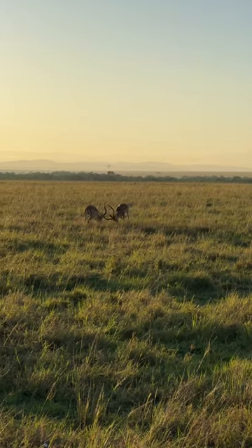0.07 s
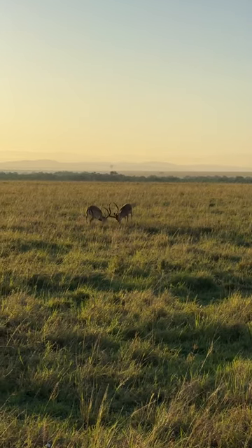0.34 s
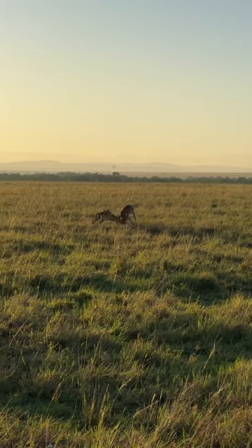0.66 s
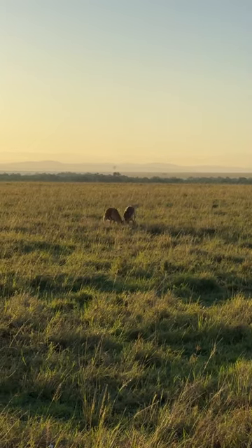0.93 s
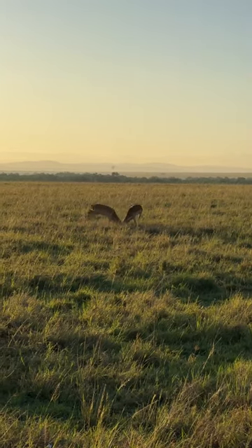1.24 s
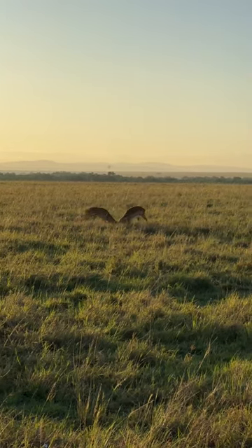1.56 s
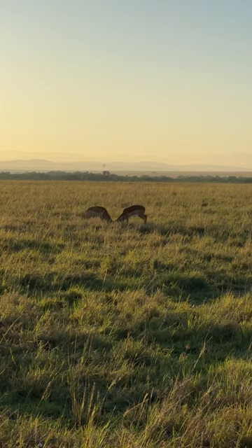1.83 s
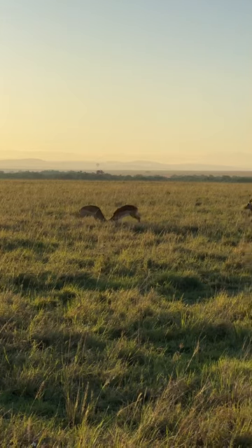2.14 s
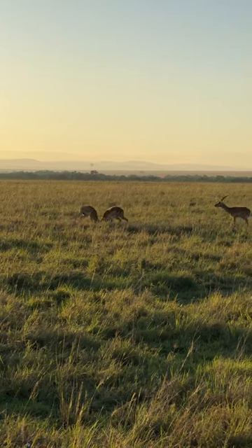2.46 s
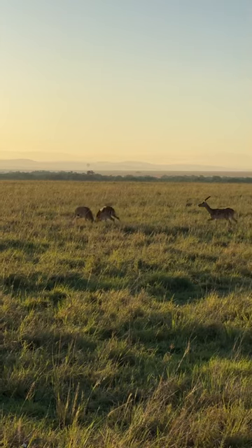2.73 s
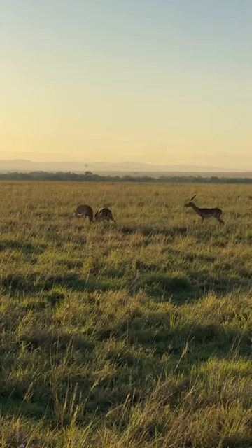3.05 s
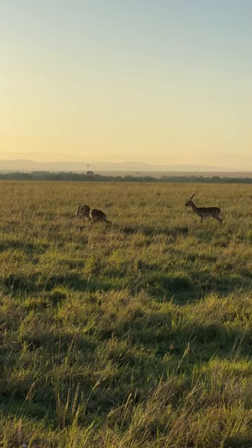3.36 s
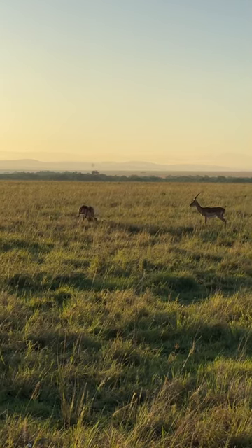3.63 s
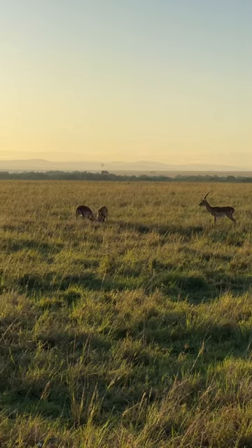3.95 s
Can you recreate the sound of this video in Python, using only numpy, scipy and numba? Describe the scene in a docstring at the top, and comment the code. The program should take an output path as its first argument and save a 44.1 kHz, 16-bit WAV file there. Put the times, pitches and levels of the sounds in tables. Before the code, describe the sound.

Antelopes grunt roughly as they fight in open grassland. One grunt leads into a brief clatter of horns, then rasping calls and more grunts with nasal wheezes, as light wind buffets the microphone.

```python
"""First comes light wind, bumping the microphone over a faint hiss of grass on an open plain.
Then two antelopes fight. Their horns knock, with one clatter as they lock.
Slow flaps of the throat make it ring in four low, rattling grunts; around and during the first
and fourth, air wheezes through the nostrils. Faster flaps make thin, rasping calls,
and a faint, slow grunt is the last call."""
import sys
import numpy as np
from scipy import signal
from scipy.fft import rfft, irfft
from scipy.io import wavfile
from numba import njit

SR = 44100
rng = np.random.default_rng(int(sys.argv[2]) if len(sys.argv) > 2 else 0)


def file_out(sig):
    """Save sig as 16-bit WAV at sys.argv[1]."""
    # one column per channel
    cols = np.atleast_2d(sig).T
    # limit, then scale
    lim = np.clip(cols, -1, 1)
    pcm = np.round(lim * 32767).astype(np.int16)
    wavfile.write(sys.argv[1], SR, pcm)


N = 176400  # 4 seconds


def amp(db):
    """Turn decibels into a volume multiplier."""
    return 10 ** (np.asarray(db) / 20)


def unit(x):
    """Scale a sound to an average strength (rms) of 1."""
    return x / np.sqrt(np.mean(x ** 2) + 1e-20)


def add(track, start, x):
    """Mix a sound into a track at a time in seconds."""
    i = max(int(start * SR), 0)
    track[i:i + len(x)] += x[:max(N - i, 0)]


def wander(per_second):
    """A smooth random drift, mostly between -1 and 1."""
    return np.interp(np.arange(N) / SR * per_second, np.arange(1024), rng.standard_normal(1024))


def colour(x, curve, amount=1):
    """Turn frequencies up or down along a curve; amount scales its decibels."""
    hz, db = np.array(curve).T
    freqs = np.maximum(np.fft.rfftfreq(x.shape[-1], 1 / SR), 1)
    gain = amp(amount * np.interp(np.log(freqs), np.log(hz), db))
    return irfft(rfft(x) * gain, x.shape[-1])


def stereo_noise(curve, spread=0.46):
    """Shaped noise whose bass, below about 320 Hz, is alike in both ears."""
    middle, side = (unit(colour(rng.standard_normal(N), curve)) for _ in range(2))
    side = signal.lfilter(*signal.butter(1, 320, "high", fs=SR), side)
    return middle + spread * side * np.array([[1], [-1]])


@njit
def band_pass(x, hz, width):
    """Keep the sound near one frequency, which may move."""
    out, band, low = np.empty(len(x)), 0., 0.
    for i in range(len(x)):
        tuning, damping = np.tan(np.pi * hz[i] / SR), width / hz[i]
        swing = (band + tuning * (x[i] + 1e-18 - low)) / (1 + tuning * (tuning + damping))
        band = 2 * swing - band
        low += 2 * tuning * swing
        out[i] = damping * swing
    return out


def ring(x, tones, stretch=1):
    """Make a sound ring at a set of tones (resonances); stretch moves them all."""
    out = 0
    for k, (hz, width, db) in enumerate(tones):
        centre = hz * stretch + np.zeros(len(x))
        # filtering twice and flipping every other sign keeps the gaps between tones quiet
        once = band_pass(x, centre, 1. * width)
        out = out + (-1) ** k * amp(db) * band_pass(once, centre, 2. * width)
    return out


def burst(decay_s, click):
    """A click and a dying puff of noise, with a total energy of 1."""
    t = np.arange(SR // 32) / SR
    puff = rng.standard_normal(len(t)) * np.exp(-t / decay_s)
    puff /= np.linalg.norm(puff)
    puff[0] += click
    return puff / np.linalg.norm(puff)


# the wind's deep tone (frequency [Hz], relative level [dB])
WIND_TONE = [(25, -14.5), (55, 6), (150, -3), (340, -12.5), (450, -30.5), (4000, -81)]
# how the rumble swells and fades (time [s], level [dB])
WIND_SWELLS = [(0, -48), (0.62, -58.5), (0.82, -51), (1.2, -66), (1.65, -55.5), (2.2, -59.5), (2.55, -58.5),
               (3.35, -61), (3.63, -70.5), (3.9, -56)]
# bumps of wind (time [s], level [dB])
WIND_BUMPS = [(0.004, -44), (0.16, -47), (0.194, -56), (1.552, -47), (1.811, -50), (2.02, -47),
              (2.093, -45.5), (2.553, -44.5), (2.787, -47.5), (3.002, -56), (3.2, -49), (3.749, -54.5),
              (3.961, -51)]


def wind(thud_hz=57.67, glide=0.616, glide_s=0.01615, rise_s=0.00078, decay_s=0.03274, rush_db=1):
    """Wind rumbles and bumps the microphone; each bump is a falling thud with a short rush."""
    t = np.arange(N) / SR
    rumble = stereo_noise(WIND_TONE) * amp(np.interp(t, *np.array(WIND_SWELLS).T))
    thuds, rush = np.zeros(N), np.zeros(N)
    age = t[:SR // 4]
    cycles = thud_hz * (age + glide * glide_s * (1 - np.exp(-age / glide_s)))  # drops to thud_hz
    for start, db in WIND_BUMPS:
        shape = amp(db) * (1 - np.exp(-age / rise_s)) * np.exp(-(age / decay_s) ** 2 / 2)
        add(thuds, start, shape * np.sin(2 * np.pi * cycles))
        add(rush, start, shape)
    return rumble + thuds + amp(rush_db) * rush * stereo_noise(WIND_TONE)


# the tone of the grass (frequency [Hz], relative level [dB])
GRASS_TONE = [(100, 5), (600, 1.5), (820, 6), (1700, -4.5), (4200, -19), (10000, -26.5), (11500, -76)]


def grass(level_db=-69.5, flicker_db=1.37):
    """Grass hisses faintly, its level flickering a little."""
    return stereo_noise(GRASS_TONE) * amp(level_db + flicker_db * wander(11))


# horn hitting horn (time [s], strength [dB], scrape fade time [s])
HORN_KNOCKS = [(0.207, -24, 0.0025), (0.6854, -5, 0.0029), (0.698, -7, 0.00343), (0.713, -0.5, 0.00756),
               (0.7379, -2.5, 0.0106), (0.7497, -6, 0.00835), (0.76, -12, 0.0039), (0.771, -6.5, 0.0124),
               (0.785, 1.5, 0.00169), (0.802, -10.5, 0.00375), (0.8252, -16, 0.0036), (0.862, -6, 0.00417),
               (3.911, -31, 0.00347)]
# tones the horns ring at (frequency [Hz], width [Hz], level [dB])
HORN_TONES = [(291, 253.5, -6.5), (915, 241, -6), (1268.4, 106.7, 1.5), (1502, 202, 1.5),
              (1895.6, 335, 3.5), (2479, 193, 3.5), (2970, 499, 0.5), (4100, 1190, -19), (5436, 884, -19.5)]


def horns():
    """Ridged horns knock and scrape, ringing briefly; shorter scrapes click harder."""
    contact = np.zeros(N)
    for start, db, scrape_s in HORN_KNOCKS:
        add(contact, start, amp(db) * burst(scrape_s, click=0.00184 / scrape_s))
    return ring(contact, HORN_TONES)


def throat_flaps(length, rate, jitter, scatter_db, puff_s, click, shrink=0):
    """The throat flaps unevenly, letting out puffs; shrink shortens them as the call runs out."""
    out, time = np.zeros(N), 0.
    for late, size in rng.standard_normal((64, 2)):
        progress = min(time / length, 1)
        puff = burst(puff_s * np.exp(-shrink * progress), click)
        add(out, time + jitter * late / rate, amp(scatter_db * size) * puff)
        time += 1 / rate
    return unit(out[:int(length * SR)])


def loudness(t, length, fade_in, fade_out, change_db):
    """A call fades in and out, its level sliding by change_db along the way."""
    fades = np.clip(t / fade_in, 0, 1) * np.clip((length - t) / fade_out, 0, 1)
    return fades * amp(change_db * t / length)


# low and high throat tones of a grunt (frequency [Hz], width [Hz], level [dB])
CHEST_TONES = [(262, 140.5, -7.5), (542.3, 155, -10), (734, 298.4, -9.5)]
GRUNT_HIGH_TONES = [(2286.6, 440, -5.5), (3072, 552, -9.5), (4149, 485, -24), (5086, 660, -25),
                    (7620, 1160, -44)]
# grunts (time [s], length [s], fade in [s], fade out [s], flap rate [Hz], level [dB],
# level change [dB], mouth tone [Hz], mouth [dB], nose [dB], treble [dB], treble change [dB])
GRUNT_CALLS = [(0.249, 0.3047, 0.0108, 0.016, 88.73, -41.5, -14.5, 1148, -1, -1.5, -6, -8),
               (2.378, 0.2679, 0.0026, 0.1092, 88.11, -42, -3.5, 1153, 3, 4, 1.5, -1.5),
               (2.773, 0.1664, 0.0756, 0.0239, 82.93, -45.5, -4, 1087, 1.5, 6.5, -8, 8.5),
               (3.273, 0.3138, 0.00497, 0.0425, 90.6, -50.5, -11, 1459, -5.5, -5, -0.5, 0.5)]


def grunts(breath_db=-12, nose_hz=1728, mouth_width_hz=190, nose_width_hz=170):
    """Slow, noisy flaps ring the chest, mouth and nose; the upper tones sink as the mouth closes."""
    out = np.zeros(N)
    for (start, length, fade_in, fade_out, rate, db, change_db,
         mouth_hz, mouth_db, nose_db, treble_db, treble_change_db) in GRUNT_CALLS:
        flaps = throat_flaps(length, rate, jitter=.04, scatter_db=1.5,
                             puff_s=0.00497, click=0.532, shrink=.5)
        t = np.arange(len(flaps)) / SR
        progress = t / length
        airflow = flaps + amp(breath_db) * rng.standard_normal(len(t))
        closing = np.exp(-0.212 * progress ** 2)
        mouth = (mouth_hz * closing, mouth_width_hz, mouth_db)
        nose = (nose_hz * np.sqrt(closing), nose_width_hz, nose_db)
        body = ring(airflow, CHEST_TONES + [mouth, nose])
        treble = ring(airflow, GRUNT_HIGH_TONES, stretch=np.exp(-0.084 * (progress - .5)))
        voice = unit(body - amp(treble_db + treble_change_db * progress) * treble)
        add(out, start, amp(db) * voice * loudness(t, length, fade_in, fade_out, change_db))
    return out


# wheezes (time [s], length [s], middle frequency [Hz], width [Hz], level [dB])
NOSE_WHEEZES = [(0.497, 0.2056, 3484, 1110, -72), (3.218, 0.101, 2303, 350, -60.5),
                (3.478, 0.0804, 4450, 884, -66)]


def wheezes(rise=0.25):
    """Air squeezed through the nostrils rings one rising tone: a squeak if narrow, a hiss if wide."""
    out = np.zeros(N)
    for start, length, hz, width, db in NOSE_WHEEZES:
        sweep = np.linspace(-.5, .5, int(length * SR))
        air = ring(rng.standard_normal(len(sweep)), [(hz, width, 0)], stretch=np.exp(rise * sweep))
        add(out, start, amp(db) * unit(air) * np.cos(np.pi * sweep))
    return out


# low and high throat tones of the calls below (frequency [Hz], width [Hz], level [dB])
RASP_LOW_TONES = [(301, 176, -0.5), (704, 254, -4), (1156, 865, -4.5), (1839, 417, 6)]
RASP_HIGH_TONES = [(2228, 483, 5.5), (2922, 593, -2.5), (3610, 620, -11.5), (4921, 636, -11),
                   (5856, 1600, -20.5)]
# rasps, and a last faint, slow grunt (time [s], length [s], fade in [s], flap rate [Hz],
# level [dB], level change [dB], treble [dB], breath [dB])
RASPS_AND_LAST_GRUNT = [(0.989, 0.265, 0.0743, 114.6, -65.5, 5.5, 2.5, -3),
                        (1.174, 0.2107, 0.0467, 117.3, -58.5, 3.5, 4, -9.5),
                        (1.418, 0.0927, 0.066, 138.7, -62, 4.5, 22.5, -13.5),
                        (1.503, 0.304, 0.0198, 154.3, -50.5, -12.5, -2, -5),
                        (1.794, 0.1223, 0.0095, 137.5, -57.5, -1.5, -3.5, -5),
                        (1.995, 0.171, 0.0555, 145.4, -53.5, -4, -6, -9),
                        (2.264, 0.1235, 0.06, 144.5, -47.5, -11, -3, -10),
                        (2.987, 0.12, 0.1495, 120.8, -64, 2, -6.5, -4),
                        (3.746, 0.1178, 0.01, 73.11, -70, 2.5, -10.5, -19)]


def rasps_and_last_grunt(rebound_s=0.001989, rebound_db=-2.5, fade_out_s=0.0272, sink_per_s=0.663):
    """Dry, rebounding flaps over rushing air rasp when fast and grunt when slow; the high tones sink."""
    out = np.zeros(N)
    for start, length, fade_in, rate, db, change_db, treble_db, breath_db in RASPS_AND_LAST_GRUNT:
        flaps = throat_flaps(length, rate, jitter=0.046, scatter_db=-0.5, puff_s=0.00195, click=1.53)
        t = np.arange(len(flaps)) / SR
        delay = rebound_s * (1 + .2 * wander(60)[:len(t)])
        rebound = amp(rebound_db) * np.interp(t - delay, t, flaps, left=0)
        airflow = unit(flaps + rebound) + amp(breath_db) * rng.standard_normal(len(t))
        treble = ring(airflow, RASP_HIGH_TONES, stretch=np.exp(-sink_per_s * (t - length / 2)))
        voice = unit(ring(airflow, RASP_LOW_TONES) - amp(treble_db) * treble)
        add(out, start, amp(db) * voice * loudness(t, length, fade_in, fade_out_s, change_db))
    return out


# the tone of the echo (frequency [Hz], boost or cut [dB])
ECHO_TONE = [(500, 5), (2600, -11), (4500, 3.5)]


def plain_echo(sound, fade_s=0.645):
    """The plain sends back an echo that dies by 60 dB in fade_s."""
    tail = stereo_noise([(20, 0), (20000, 0)], spread=0.11) * amp(-60 * np.arange(N) / SR / fade_s)
    tail /= np.linalg.norm(tail[0])
    return signal.fftconvolve(colour(sound, ECHO_TONE)[None], tail)[:, :N]


# left-right balance, of which each ear takes a share (frequency [Hz], lean to the left [dB])
BALANCE = [(420, 4), (560, -10.5), (900, -9), (1300, -12), (1750, 0)]


def scene(distance_cut_hz=9260, echo_db=-13):
    """Wind and grass surround the animals, a little to the right and dulled by distance."""
    air = wind() + grass()
    animals = horns() + grunts() + wheezes() + rasps_and_last_grunt()
    animals = signal.sosfilt(signal.butter(4, distance_cut_hz, fs=SR, output="sos"), animals)
    left = colour(animals, BALANCE, amount=0.202)
    right = colour(animals, BALANCE, amount=-0.4975)
    return air + np.array([left, right]) + amp(echo_db) * plain_echo(animals)


def record(dry, top_hz=15200):
    """Cut away the very highest treble."""
    return signal.sosfilt(signal.ellip(8, .2, 70, top_hz, fs=SR, output="sos"), dry)


dry = scene()
out = record(dry)
file_out(out)
```